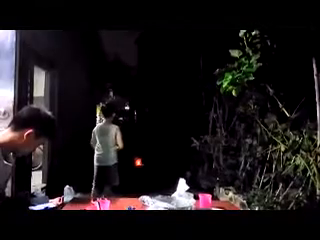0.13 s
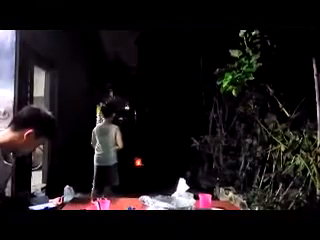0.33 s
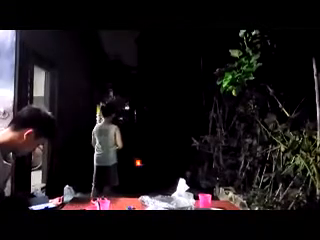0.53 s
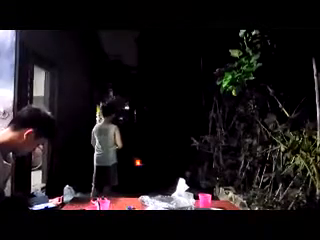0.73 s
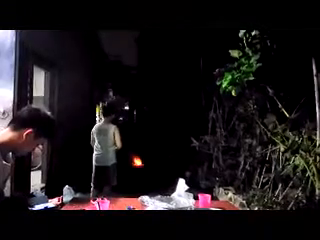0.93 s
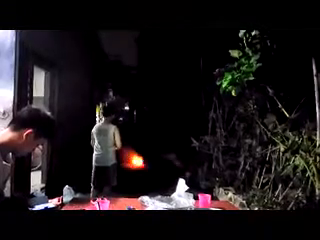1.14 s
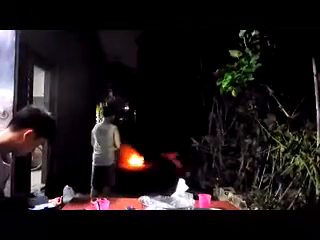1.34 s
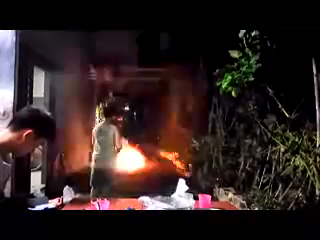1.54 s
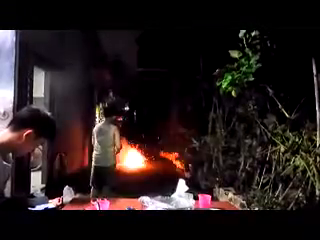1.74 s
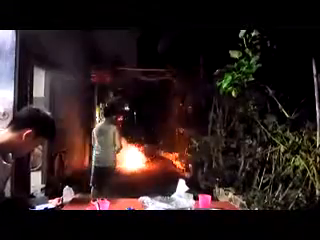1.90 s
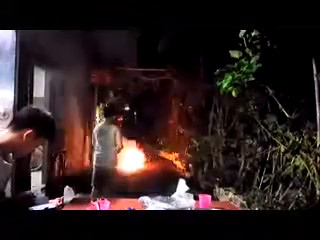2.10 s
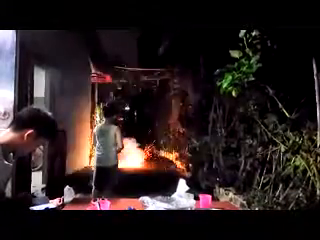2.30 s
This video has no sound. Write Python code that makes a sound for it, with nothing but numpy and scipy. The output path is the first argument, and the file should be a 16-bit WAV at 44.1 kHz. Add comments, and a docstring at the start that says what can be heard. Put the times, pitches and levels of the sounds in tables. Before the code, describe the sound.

A string of firecrackers explodes beside a house at night: quiet air with a faint chirping cricket, a small fuse fizz, then rapid irregular bangs squashed by the overloaded microphone into one dense crackle.

```python
"""Firecrackers at night

A string of firecrackers goes off on the ground beside a house: a ragged run of bangs, each a shock front,
a crack and a pressure swing followed by decaying noise for the echoes of walls and bushes.
Low resonant thumps lie among them. Before the bangs a cricket chirps in falling tones and a fuse spits and
fizzes as coloured noise, over night air with a faint drone and one soft low ring.
The recorder's limiter presses the bangs into one dense crackle."""
import sys
import numpy as np
from scipy import signal
from scipy.fft import rfft, irfft, next_fast_len
from scipy.io import wavfile
from scipy.ndimage import uniform_filter1d, minimum_filter1d

SR = 44100
rng = np.random.default_rng(int(sys.argv[2]) if len(sys.argv) > 2 else 0)


def wav_out(sig):
    """Save sig, one row per channel (or a flat mono array), as 16-bit PCM at SR to the path in sys.argv[1]."""
    wavfile.write(sys.argv[1], SR, np.round(np.clip(np.atleast_2d(sig).T, -1, 1) * 32767).astype(np.int16))


N = 108309
T = np.arange(N) / SR
SIDE_DB = -7.5  # side noise relative to mid noise, before the recorder narrows the image


def from_db(db):
    """Amplitude ratio: 20 dB is a factor of ten in pressure."""
    return 10 ** (np.asarray(db) / 20)


def rms_one(x):
    """Power normalisation: scale to a root mean square of one."""
    return x / np.sqrt(np.mean(x ** 2) + 1e-20)


def dying(t, t60):
    """Exponential decay: from t = 0 the level falls 60 dB in t60 seconds."""
    return (t >= 0) * np.exp(-np.log(1000) * np.maximum(t, 0) / t60)


def add(out, start_s, sound):
    """Superposition: sound pressures sum, here from start_s onward."""
    i = int(start_s * SR)
    out[:, i:i + sound.shape[-1]] += sound[..., :N - i]


def mid_side_to_stereo(mid, side):
    """Sum and difference: left is mid plus side, right is mid minus side."""
    return np.array([mid + side, mid - side])


def coloured(white, spectrum, tilt_db=0):
    """Spectral shaping: two white noises become stereo noise of rms 1, tilted in dB per octave above 700 Hz."""
    n = white.shape[-1]
    size = next_fast_len(n)
    hz = np.maximum(np.fft.rfftfreq(size, 1 / SR), 1)
    points_hz, points_db = np.transpose(spectrum)
    db = np.interp(np.log(hz), np.log(points_hz), points_db)
    db = db + tilt_db * np.log2(np.maximum(hz, 700))
    shaped = irfft(rfft(white, size) * from_db(db), size)[:, :n]
    mid, side = shaped * from_db([[0], [SIDE_DB]])
    return rms_one(mid_side_to_stereo(mid, side))


def resonate(x, hz, width_hz):
    """Damped resonance: a pole pair whose radius sets the bandwidth, with gain 1 at its peak."""
    r = np.exp(-np.pi * width_hz / SR)
    zeros = np.array([1, 0, -1]) * (1 - r * r) / 2
    poles = [1, -2 * r * np.cos(2 * np.pi * hz / SR), r * r]
    return signal.lfilter(zeros, poles, x)


# Firecracker bangs: start_s [s], level_db [dB], tilt_db [dB per octave],
# swing_db [dB relative to the bang]
BANG_TABLE = [(0.7849, -3, 1.24, -48), (.852, 1.5, 0.55, -26), (0.93, 4, -0.5, -25), (0.956, 9.5, 1.5, -40),
              (1.040, 12.5, -0.5, -19), (1.071, 11.5, 0.5, -21), (1.123, -0.5, 7, -30), (1.160, -1, 0, -19),
              (1.184, 1.5, 0.5, -38), (1.211, 2.5, 0.5, -16), (1.25, 12, -0.5, -39),
              (1.272, 17.5, -0.5, -32), (1.309, 8.5, 3, -40), (1.325, 6.5, 3, -38), (1.377, 11, 0, -22),
              (1.401, 7, 0.5, -24), (1.475, 13.5, 0, -20), (1.577, 5.5, 0, -43), (1.640, 10, -.5, -31),
              (1.668, 12, -0.5, -31), (1.685, 15, 0, -41), (1.717, 7.5, -1, -31), (1.79, 9.5, -2, -28),
              (1.814, -2, -4.5, -35), (1.865, -3, -2.5, -42), (1.903, 8.5, 0.5, -16.5),
              (1.962, 12, -1.77, -20), (2.1088, -3.5, 0, -25), (2.155, 1.5, -0.5, -16),
              (2.2742, 15, 0.5, -16.5)]
# Colour of shock, crack and near echoes: frequency_hz [Hz], density_db [relative dB per Hz]
NEAR_SPECTRUM = [(30, -21.5), (110, -19.5), (160, -6.5), (300, -6), (480, -4), (900, -3.5), (2000, 0),
                 (4000, 3.5), (6500, 3), (8000, -4), (10000, -15.5), (14000, -37.5)]
# Colour of the far wash: frequency_hz [Hz], density_db [relative dB per Hz]
FAR_SPECTRUM = [(30, -28), (110, -29), (170, -11), (320, -8.5), (550, -2), (1400, 1), (2400, 0), (4000, 3),
                (6500, 1), (8000, -10.5), (10000, -23.5), (14000, -48)]
# The front overloads the microphone, so its level is the same for every bang
SHOCK_DB, SHOCK_T60_S, SHOCK_TILT_DB = -6.5, 0.0059, 6.5
CRACK_DB, CRACK_T60_S, CRACK_TILT_DB = -16.5, 0.01, -4.5  # its tilt adds to the bang's own
SWING_S = 0.001  # time from the pressure peak to its zero crossing
NEAR_DB, NEAR_T60_S = -9, 0.2
FAR_DB, FAR_T60_S, FAR_BUILD_S = -16.5, .42, 0.042
SAME_PATH = 0.51  # share of the echo pattern's power that all bangs have in common


def firecrackers():
    """Blast and reverberation: a shock, crack and pressure swing, then near echoes and a slower far wash."""
    out, t = np.zeros((2, N)), T[:2 ** 15]
    common = rng.standard_normal((2, 2, len(t)))
    for start_s, level_db, tilt_db, swing_db in BANG_TABLE:
        own = rng.standard_normal(common.shape)
        near, far = np.sqrt(SAME_PATH) * common + np.sqrt(1 - SAME_PATH) * own

        shock_noise = coloured(far, NEAR_SPECTRUM, SHOCK_TILT_DB).mean(axis=0)
        shock = from_db(SHOCK_DB) * shock_noise * dying(t, SHOCK_T60_S)

        crack_noise = coloured(far, NEAR_SPECTRUM, tilt_db + CRACK_TILT_DB).mean(axis=0)
        crack = from_db(CRACK_DB) * crack_noise * dying(t, CRACK_T60_S)

        # Overpressure, then suction of equal area
        swing = from_db(swing_db) * (1 - t / SWING_S) * np.exp(-t / SWING_S)

        echoes = from_db(NEAR_DB) * coloured(near, NEAR_SPECTRUM, tilt_db) * dying(t, NEAR_T60_S)
        wash = from_db(FAR_DB) * coloured(far, FAR_SPECTRUM, tilt_db) * dying(t, FAR_T60_S)
        wash = wash * (1 - np.exp(-t / FAR_BUILD_S))
        add(out, start_s, shock + from_db(level_db) * (crack + swing + echoes + wash))
    return out


# Low thumps in the run of bangs: start_s [s], level_db [dB, peak]
THUMP_TABLE = [(.853, -14), (1.0185, -8.5), (1.342, -5), (1.462, -8), (1.580, -11), (1.819, -5)]
THUMP_HZ, THUMP_WIDTH_HZ, THUMP_T60_S = 480, 350, .05  # the decay is that of the exciting noise


def thumps():
    """Forced resonance: a decaying noise burst excites a broad low resonance."""
    out, t = np.zeros((2, N)), T[:SR // 2]
    for start_s, level_db in THUMP_TABLE:
        excitation = rng.standard_normal(len(t)) * dying(t, THUMP_T60_S)
        burst = resonate(excitation, THUMP_HZ, THUMP_WIDTH_HZ)
        add(out, start_s, from_db(level_db) * burst / np.abs(burst).max())
    return out


# Colour of the burning fuse: frequency_hz [Hz], density_db [relative dB per Hz]
FUSE_SPECTRUM = [(100, -16), (400, 3), (900, -11), (1300, 2), (2600, 4), (4400, 7.5), (6200, 6),
                 (8000, -10), (14000, -34)]
FUSE_S = .438
SPIT_DB, SPIT_T60_S, FIZZ_DB, FIZZ_T60_S = -41.5, 0.064, -55, 3


def fuse():
    """Turbulent noise: the fuse catches with a brief spit and fizzes on under a slow decay."""
    spit = from_db(SPIT_DB) * dying(T - FUSE_S, SPIT_T60_S)
    fizz = from_db(FIZZ_DB) * dying(T - FUSE_S, FIZZ_T60_S)
    return (spit + fizz) * coloured(rng.standard_normal((2, N)), FUSE_SPECTRUM)


# Cricket chirps: time_s [s]
CHIRP_TIMES = [.023, .163, .300, .432, .568, .708]
# Syllables within a chirp: offset_s [s, from the chirp time to the syllable's peak], level_db [dB]
SYLLABLE_TABLE = [(-.021, -4), (0, 0)]
CRICKET_DB, CRICKET_HZ, CRICKET_FALL_HZ_PER_S = -53.5, 6950, 81000  # pitch is that at the peak
SYLLABLE_S = 0.0047  # from the peak to 1/e of its height
CRICKET_ECHO_DB, CRICKET_T60_S = 6, .25  # energy of the mid echoes relative to the direct path


def cricket():
    """Frequency glide and multipath: two falling tones per chirp, smeared by echoes in the garden."""
    song = np.zeros((2, N))
    t = np.arange(-SR // 100, SR // 100) / SR
    # Half the fall rate in the phase gives the full rate in instantaneous frequency
    tone = np.sin(2 * np.pi * (CRICKET_HZ - CRICKET_FALL_HZ_PER_S * t / 2) * t)
    syllable = np.exp(-(t / SYLLABLE_S) ** 2) * tone
    for time_s in CHIRP_TIMES:
        for offset_s, level_db in SYLLABLE_TABLE:
            tail = rng.standard_normal((2, SR // 2)) * dying(T[:SR // 2], CRICKET_T60_S)
            mid, side = tail * from_db([[0], [SIDE_DB]])
            paths = from_db(CRICKET_ECHO_DB) * mid_side_to_stereo(mid, side) / np.linalg.norm(mid)
            paths[:, 0] += 1  # the direct path
            heard = signal.fftconvolve(paths, syllable[None])
            add(song, max(0, time_s + offset_s + t[0]), from_db(CRICKET_DB + level_db) * heard)
    return song


# Colour of the night air: frequency_hz [Hz], density_db [relative dB per Hz]
NIGHT_SPECTRUM = [(30, -13), (80, -27), (130, -9), (220, -4.5), (310, -10), (480, -9.5), (1000, -15.5),
                  (2000, -19), (4500, -15), (6300, -13.5), (8000, -19.5), (14000, -38)]
NIGHT_DB = -60.5
DRONE_DB, DRONE_HZ, DRONE_WIDTH_HZ = -67.5, 231, 39  # width of each of two resonances in series
RING_DB, RING_HZ, RING_S, RING_LENGTH_S = -59.5, 199, 0.57, 0.12  # centre time; peak to 1/e


def night():
    """Stationary noise: still air, a faint drone of narrowband noise and one low ring that swells and fades."""
    air = coloured(rng.standard_normal((2, N)), NIGHT_SPECTRUM)
    drone = rng.standard_normal(N + SR)
    for _ in range(2):
        drone = resonate(drone, DRONE_HZ, DRONE_WIDTH_HZ)
    drone = rms_one(drone[SR:])  # the first second lets the resonances settle
    ring = np.exp(-((T - RING_S) / RING_LENGTH_S) ** 2) * np.sin(2 * np.pi * RING_HZ * T)
    return from_db(NIGHT_DB) * air + from_db(DRONE_DB) * drone + from_db(RING_DB) * ring


def scene():
    """Superposition: the pressures of all sources sum at the microphone."""
    return firecrackers() + thumps() + fuse() + cricket() + night()


LIMIT_DB, RELEASE_DB_PER_S, DETECT_S, AHEAD_S = -9.5, 320, 0.0015, 0.0012
STEREO_ABOVE_HZ, STOPBAND_HZ, CLIP_TOP = 5980, 15200, .88


def record(dry):
    """Dynamic compression: a look-ahead limiter ducks loud peaks; only treble is stereo, peaks clip, the top is cut."""
    mid, side = dry.mean(axis=0), (dry[0] - dry[1]) / 2
    power = uniform_filter1d(mid ** 2, max(2, int(DETECT_S * SR)))
    over_db = np.maximum(10 * np.log10(np.maximum(power, 1e-12)) - LIMIT_DB, 0)
    # The reduction jumps up at once and falls back at a constant rate
    release_db = RELEASE_DB_PER_S * T
    held_db = np.maximum.accumulate(over_db + release_db) - release_db
    ahead = max(2, int(AHEAD_S * SR))
    gain = from_db(uniform_filter1d(minimum_filter1d(-held_db, 2 * ahead), ahead))

    highpass = signal.butter(10, STEREO_ABOVE_HZ, "high", fs=SR, output="sos")
    treble_side = signal.sosfilt(highpass, side * gain)
    stereo = mid_side_to_stereo(mid * gain, treble_side)
    clipped = np.clip(stereo, -CLIP_TOP, CLIP_TOP)
    lowpass = signal.cheby2(12, 70, STOPBAND_HZ, fs=SR, output="sos")
    return signal.sosfilt(lowpass, clipped)


dry = scene()
out = record(dry)
wav_out(out)
```